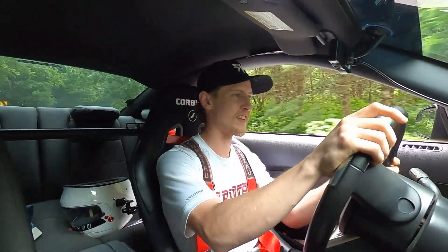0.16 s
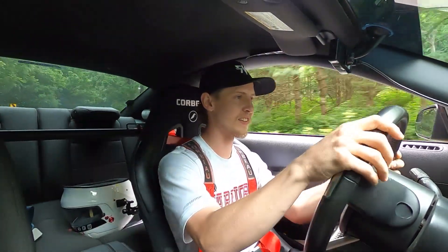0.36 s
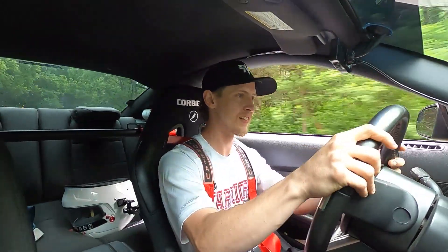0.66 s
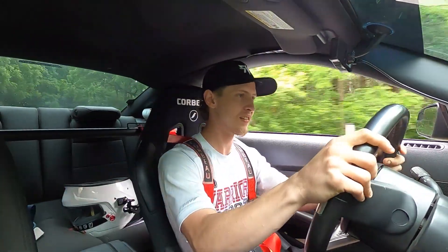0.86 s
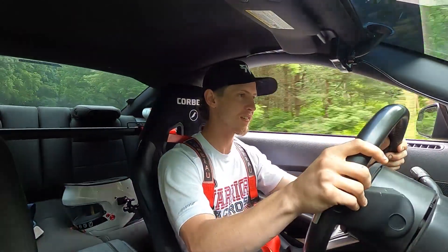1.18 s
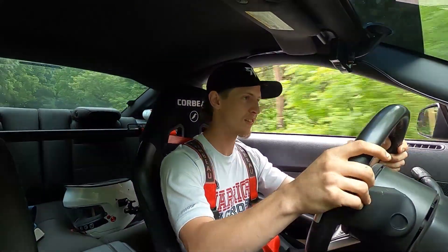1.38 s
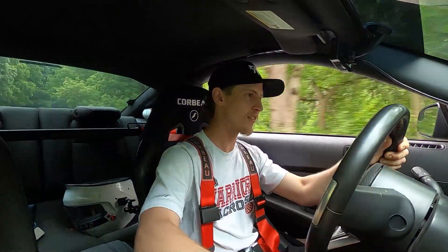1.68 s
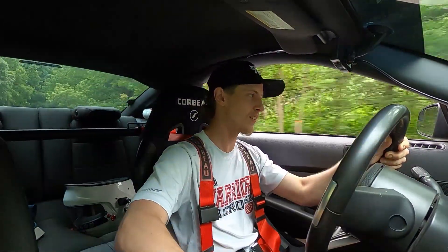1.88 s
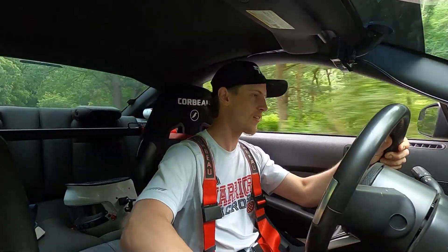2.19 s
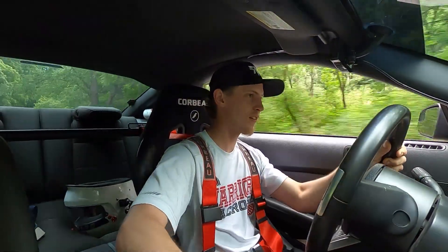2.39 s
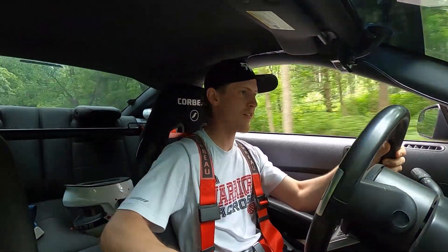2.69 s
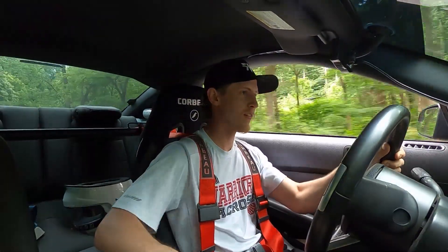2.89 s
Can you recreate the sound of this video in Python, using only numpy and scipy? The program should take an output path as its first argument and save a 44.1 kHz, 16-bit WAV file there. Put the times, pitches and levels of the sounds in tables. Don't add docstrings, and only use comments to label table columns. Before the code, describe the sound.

A V8 engine heard inside a boomy car cabin growls at part throttle, then opens up around 0.6 s with a harder bark and bright rasp. Its pitch climbs steadily until about 2.35 s. At 2.5 s the throttle shuts; the tone burbles, falters near 2.7 s and sinks. Wind hiss becomes clearer, with a brief airy whistle near 2.9 s, over low tyre rumble and very faint trim ticks.

```python
import sys
import numpy as np
from scipy import signal
from scipy.fft import rfft, irfft, next_fast_len
from scipy.io import wavfile
from scipy.ndimage import uniform_filter1d, map_coordinates

SR = 44100
rng = np.random.default_rng(int(sys.argv[2]) if len(sys.argv) > 2 else 0)


def file_out(sig):
    cols = np.atleast_2d(sig).T
    lim = np.clip(cols, -1, 1)
    pcm = np.round(lim * 32767).astype(np.int16)
    wavfile.write(sys.argv[1], SR, pcm)


def boost_factor(decibels):
    exponent = np.asarray(decibels, float) / 20
    return 10 ** exponent


N = 134505
TIME = np.arange(N) / SR
STEP = 32


def unit(x):
    return x / np.sqrt(np.mean(np.abs(x) ** 2) + 1e-20)


def along(points, hz):
    f, v = np.transpose(points)
    return np.interp(np.log(hz + 1), np.log(f + 1), v)


def curves(rows):
    s, *columns = np.transpose(rows)
    return [np.interp(TIME, s, column) for column in columns]


def ramp(t, middle_s, takes_s):
    return np.clip((t - middle_s) / takes_s + 0.5, 0, 1)


def bell(t, middle, width):
    return np.exp(-0.5 * ((t - middle) / width) ** 2)


def wobble(rate, step=1):
    knots = rng.standard_normal(int(N * 60 / SR))
    return map_coordinates(knots, [np.arange(0, N, step) * rate / SR])


def rush(spectrum, patchy_db, gate=1):
    z = signal.stft(rng.standard_normal(N), nperseg=512)[2]
    field = uniform_filter1d(rng.standard_normal(z.shape), size=6, axis=0)
    field = uniform_filter1d(field, size=14, axis=1)
    patchy = signal.istft(z * boost_factor(patchy_db * unit(field)), nperseg=512)[1][:N]
    m = next_fast_len(N + 8192)
    colour = boost_factor(along(spectrum, np.fft.rfftfreq(m, 1 / SR)))
    return unit(irfft(rfft(patchy * gate, m) * colour, m)[:N])


# time in seconds, four-stroke cycles in Hz, engine level in dB.
ENGINE_SPEED = [(0.0, 28.24, -1), (0.26, 28.85, 0.4), (0.47, 29.15, 1.7), (0.64, 30.54, 2.2),
                (0.75, 30.4, 0), (1.17, 32.92, 0.3), (1.53, 34.61, 0.1), (1.83, 36.87, -0.9),
                (1.94, 37.19, -0.8), (2.34, 39.74, 1.65), (2.47, 38.61, 0.3), (2.56, 38.52, 0.5),
                (2.8, 36.31, -1.2), (2.85, 34.93, -1), (2.96, 34.17, 1.3), (3.05, 34.13, -2)]


def engine():
    state = throttle()
    cycle_hz, level_db = curves(ENGINE_SPEED)
    turn = 0.06 + 2 * np.pi * np.cumsum(cycle_hz) / SR
    firing = 1 + 0.07 * (np.cos(8 * turn) + 0.6 * np.cos(4 * turn) + 0.3 * np.cos(2 * turn))
    body = boost_factor(level_db) * (orders(state, cycle_hz, turn) + boom(state))
    return body + rasp(firing) + snarl(turn) + engine_bay(firing)


def throttle():
    opened = ramp(TIME, 0.61, takes_s=0.28)
    shut = ramp(TIME, 2.535, takes_s=0.035)
    return np.array([1 - opened, opened - shut, shut])


# multiple of the cycle rate, dB at part throttle, dB wide open at low, middle and high speed.
POWER_TONES = [(1, -4.5, -6, -3, -6.5), (2, -20.5, -14, -19.5, -12), (3, -12, -8.0, -17.5, -17.5),
               (4, -17, -4, -5.5, 2.5), (5, 0.5, 1, 8, 4.5), (6, 9.5, -2, 1.0, -8),
               (7, -1, -1.5, 6.5, -0.5), (8, 0, 10.5, 8.5, 11.5), (9, -6, -0.5, -2, 6),
               (10, -12, -4, 1.5, 14.5), (11, 0, 3, 5.5, -5.5), (12, -15, 0, 6, -10),
               (13, 8.5, 14.5, -4.5, -1.5), (14, 3, 4, -5.5, -7), (15, -0.5, -2, -1, -1),
               (16, 6.5, 8.5, -2, 3.5), (17, -4.5, 4, -14.5, -7), (18, -8.5, -7.0, -3.5, -9),
               (19, -12.5, -20, 9.5, 4.0), (20, -9, 2, 4.5, 9), (21, -10, -5.5, 7, 2.5),
               (22, -2.5, 7, -9.5, 11.5), (23, 2.5, 5.5, 13, 7), (24, 3.5, 9.5, 2, 0.5),
               (25, -3.5, 11.5, 10, -4), (26, -6.5, 2.5, 4, -3.5), (27, 1.5, 14, 2.5, 8.5),
               (28, 5, 11.5, 5.5, 9.5), (29, 4.5, 11, 3, -2), (30, -2.5, 10, -3, 2.0),
               (31, 7, -2, 1.5, 8.5), (32, 2, -2, 0.5, 3.0), (33, 4, 7, 7, -1), (34, -5, 3, 2, -3.5),
               (35, -4, 6.5, 0, -2), (36, -3, 15.5, 0, 0.5)]
SPEEDS_HZ = [31, 35.5, 39.5]
# multiple of the cycle rate, dB burbling, dB coasting, dB settled.
OVERRUN_TONES = [(1, -12.0, -17, -12.0), (2, -12.5, -12.5, -12), (3, -2.5, -10, -10), (4, -4, -0.5, -11.5),
                 (5, 0, 1.5, 8.5), (6, 10.5, 4.5, -2.5), (7, -18, 5, 1), (8, 2, 3, -4.5),
                 (9, -3.5, -2.5, -10.5), (10, 1, -4, -9.5), (11, -9, -1, 5.0), (12, -11, 3, -2),
                 (13, -13, -6, -5.5), (14, -9, -13, -11.5), (15, -8, -8.5, -10), (16, -6, -8, -6),
                 (17, -6, -11.5, -9.5), (18, -11, -10, -10), (19, 1, -22, -3.5), (20, 0.5, -10.0, -7.0),
                 (21, 2, -7.5, -11.5), (22, 0, 2, -5.5), (23, -4, -9, -6), (24, -6, 4, 6),
                 (25, -13, -5, -2.0), (26, -1.5, -7, 2.5), (27, -13, -18, -0.5), (28, -5, -11, -3.5),
                 (29, -7, -12, -4.5), (30, 5.0, -13, -4), (31, -2.5, -5, 0.5), (32, 7, -7, -1),
                 (33, 9, -5, 1), (34, -0.0, 2.0, -2), (35, -6, -3, 4), (36, -3, -8, 3)]
ROUGHNESS = [.002, .005, .12]
# frequency in Hz, level in dB.
BODYWORK = [(25, -55), (60, -32), (120, -31), (400, -34), (700, -41), (900, -54), (1200, -60)]
# centre in Hz, width in Hz, boost in dB.
CABIN_MODES = [(136, 25.2, 14.5), (189.9, 7.7, 9.5), (233.4, 5.4, -2.5), (263, 8.9, 6), (291.8, 19.7, 11.0),
               (335.3, 11, 7), (388, 37.3, -11.5), (467.7, 11, 6), (517, 14.6, 7), (568.4, 37, 13.5),
               (643, 14, 2), (698.4, 24, 3), (743, 7.9, 2), (910, 26, -4)]


def orders(state, cycle_hz, turn):
    burble_ends_s, settles_s, change_s = 2.72, 2.99, 0.05
    smear_hz = 21.92
    at = np.arange(0, N, STEP)
    state, cycle_hz, t = state[:, ::STEP], cycle_hz[::STEP], at / SR
    part, full, shut = state
    coasts = ramp(t, burble_ends_s, change_s)
    settles = ramp(t, settles_s, change_s)
    overrun = np.array([shut - coasts, coasts - settles, settles])
    stumble_db = -2 * bell(t, burble_ends_s, 0.022)

    out = np.zeros(N)
    for k, (power_row, overrun_row) in enumerate(zip(POWER_TONES, OVERRUN_TONES), start=1):
        _, part_db, *open_db = power_row
        _, *shut_db = overrun_row
        hz = k * cycle_hz
        source_db = part * part_db + full * np.interp(cycle_hz, SPEEDS_HZ, open_db)
        source_db = source_db + shut_db @ overrun + stumble_db
        cabin_db = along(BODYWORK, hz) + sum(db * bell(hz, c, w) for c, w, db in CABIN_MODES)

        rough = np.clip(ROUGHNESS @ state + 0.0003 * k ** 2, 0, 1)
        steady = np.sqrt(1 - rough) * boost_factor(0.4 * wobble(5.0, STEP))
        smear = (wobble(smear_hz, STEP) + 1j * wobble(smear_hz, STEP)) / np.sqrt(2)
        size = boost_factor(source_db + cabin_db) * (steady + np.sqrt(rough) * smear)

        phase = k * turn + 3 * np.pi / 8 * k ** 2 + 1.41
        out += np.sqrt(2) * np.real(np.interp(np.arange(N), at, size) * np.exp(1j * phase))
    return out


# frequency in Hz, level in dB per Hz.
BOOM_COLOUR = [(35, -61), (60, -17.5), (97, -19), (166, -6), (220, -6.5), (312, -10.5), (373, -12.5),
               (528, -9.5), (1300, -33.5), (1690, -64), (2860, -120)]


def boom(state):
    level_db = -26.5 + [-6.5, 0, 1] @ state
    return boost_factor(level_db) * rush(BOOM_COLOUR, patchy_db=-2.5)


# frequency in Hz, level in dB per Hz.
RASP_COLOUR = [(500, -61), (950, -4), (1300, -5.5), (1870, -3), (2300, -9), (3500, -8), (4600, -23.5),
               (7000, -52.5), (12000, -110)]
# frequency in Hz, level in dB per Hz.
FIZZ_COLOUR = [(2500, -64.5), (4500, 7), (6500, -1.5), (9000, -10.5), (11800, -21.5), (13500, -37.5),
               (16000, -86.5)]
# time in seconds, level in dB.
RASP_SWELL = [(.3, -19.5), (.55, -10.5), (.64, -4.5), (.72, 3), (.9, 1.5), (1.3, -1), (1.7, 1.5),
              (2.05, -4), (2.4, -0.5), (2.6, -5.5)]


def rasp(firing):
    swell_db, = curves(RASP_SWELL)
    rough = boost_factor(-35 + swell_db) * rush(RASP_COLOUR, patchy_db=1.5, gate=firing)
    sets_in = np.clip((TIME - 0.655) / 0.05 + 0.5, 0.05, 1)
    fizz = sets_in * boost_factor(-56 + swell_db) * rush(FIZZ_COLOUR, patchy_db=2.0, gate=firing)
    return rough + fizz


# frequency in Hz, level in dB per Hz.
SNARL_COLOUR = [(900, -57.5), (1350, -10.5), (1600, -1.5), (1900, -2), (2200, -22), (3200, -72.5)]
# time in seconds, level in dB.
SNARL_SWELL = [(.25, -51.5), (.42, -45), (.56, -42), (.8, -42.5), (1.1, -42.5), (1.5, -51.5), (2.5, -54),
               (2.6, -83)]


def snarl(turn):
    throb = np.cos(turn) + np.cos(2 * turn) + np.cos(3 * turn) + 0.7 * np.cos(4 * turn)
    level_db, = curves(SNARL_SWELL)
    return boost_factor(level_db) * rush(SNARL_COLOUR, patchy_db=-2.0, gate=1 + 0.25 * throb)


# frequency in Hz, level in dB per Hz.
BAY_COLOUR = [(500, -40.5), (900, -10), (1700, -21), (2500, -28.5), (5200, -42.5), (6500, -42.5),
              (11500, -57.5), (14000, -100)]


def engine_bay(firing):
    return boost_factor(-41) * rush(BAY_COLOUR, patchy_db=1, gate=firing)


# start in seconds, level in dB.
KNOCKS = [
    (.174, -33),
    (.592, -21.5),
    (0.865, -22),
]
# frequency in Hz, level in dB per Hz.
KNOCK_COLOUR = [(400, -39), (700, 5), (1800, -8), (3500, -26), (6000, -60.5)]


def knocks():
    rise_s, t60_s = 0.003, 0.074
    shape = np.zeros(N)
    for start_s, db in KNOCKS:
        after = np.maximum(TIME - start_s, 0)
        shape += (1 - np.exp(-(after / rise_s) ** 2)) * boost_factor(db - 60 * after / t60_s)
    return shape * rush(KNOCK_COLOUR, patchy_db=0)


# frequency in Hz, level in dB per Hz.
WIND_COLOUR = [(600, -59.5), (1400, -10), (2280, -4), (2900, -9), (5400, -17.5), (6200, -19),
               (12000, -36.5), (14500, -59.5), (16000, -100)]
# time in seconds, level in dB.
WIND_LEVEL = [(0, -68.5), (.6, -58), (.75, -41.5), (2.1, -40.5), (2.5, -37.5), (2.75, -34.5), (2.88, -33),
              (3.05, -33)]
# frequency in Hz, level in dB per Hz.
GAP_COLOUR = [(1500, -74), (1950, -3), (2280, 5), (2650, -19), (3400, -74)]


def wind():
    level_db, = curves(WIND_LEVEL)
    hiss = boost_factor(level_db + 0.69 * wobble(8)) * rush(WIND_COLOUR, patchy_db=0.4)
    gust = bell(TIME, 2.86, 0.056)
    return hiss + boost_factor(-39) * gust * rush(GAP_COLOUR, patchy_db=9.0)


# frequency in Hz, level in dB per Hz.
ROAD_COLOUR = [(11, -45.5), (18, -16), (32, -7.5), (92, -12), (110, -14), (140, -22), (240, -120)]
# time in seconds, level in dB.
ROAD_SWELL = [(0, -1), (.25, 3), (.6, -1.5), (1.2, -2.5), (1.55, -3), (2, 1.5), (2.55, 0), (2.68, -8),
              (2.8, 0), (3.05, 9)]


def road():
    swell_db, = curves(ROAD_SWELL)
    rumble = boost_factor(-43.5 + swell_db + 1.3 * wobble(3.9)) * rush(ROAD_COLOUR, patchy_db=0.5)
    bump_s, bump_hz = 2.7, 45.1
    bump = boost_factor(-25) * bell(TIME, bump_s, 0.066) * np.sin(2 * np.pi * bump_hz * (TIME - bump_s))
    return rumble + bump


# start in seconds, level in dB, time to fall by 60 dB in seconds.
TICKS = [(.008, -53, .25), (.24, -64, .06), (.44, -62, .05), (.868, -58, .06), (.665, -62, .05),
         (1.1, -61, .04), (1.3, -61, .04), (1.722, -58, .12)]
# frequency in Hz, level in dB per Hz.
TICK_COLOUR = [(2000, -17), (4000, 3), (9000, -3), (15000, -5), (16000, -41)]


def trim():
    rise_s = 0.003
    shape = np.zeros(N)
    for start_s, db, t60_s in TICKS:
        after = np.maximum(TIME - start_s, 0)
        shape += (1 - np.exp(-after / rise_s)) * boost_factor(db - 60 * after / t60_s)
    return shape * rush(TICK_COLOUR, patchy_db=3)


def scene():
    return (engine() + knocks() + wind() + road() + trim())[None]


def low_pass(x):
    return signal.sosfilt(signal.butter(12, 15590, fs=SR, output="sos"), x)


def record(dry):
    ceiling, knee = 0.9, 5
    x = dry / (1 + np.abs(dry / ceiling) ** knee) ** (1 / knee)
    return low_pass(x)


dry = scene()
out = record(dry)
file_out(out)
```